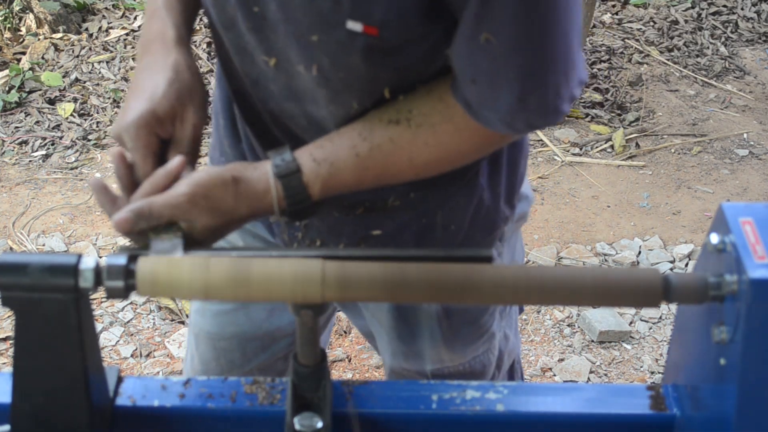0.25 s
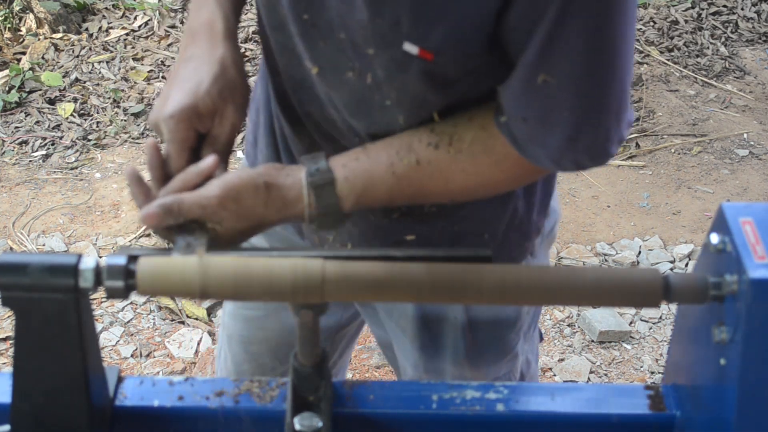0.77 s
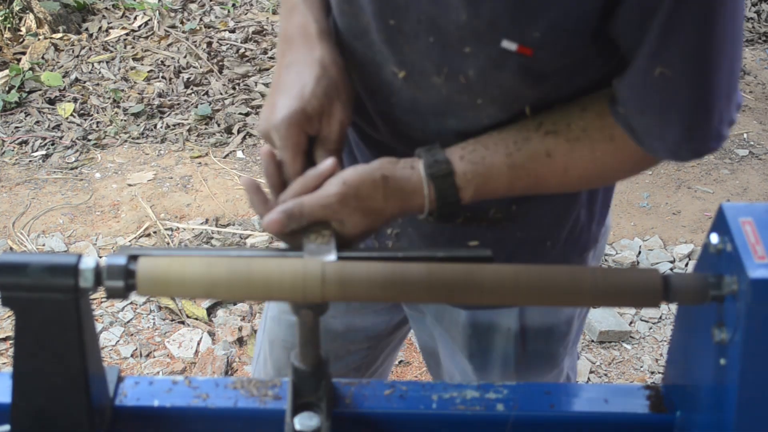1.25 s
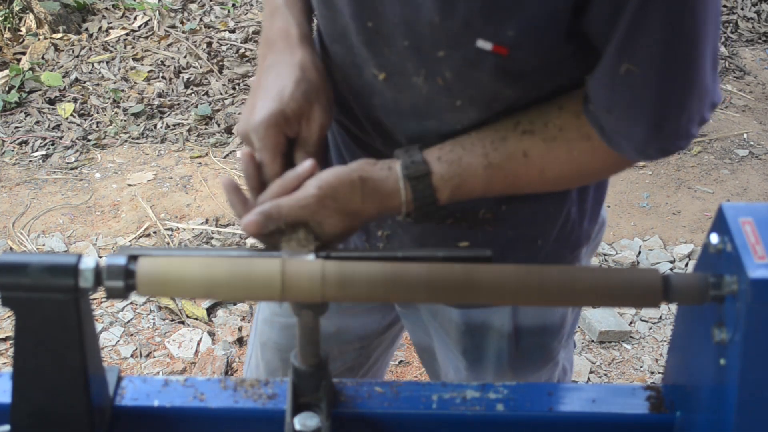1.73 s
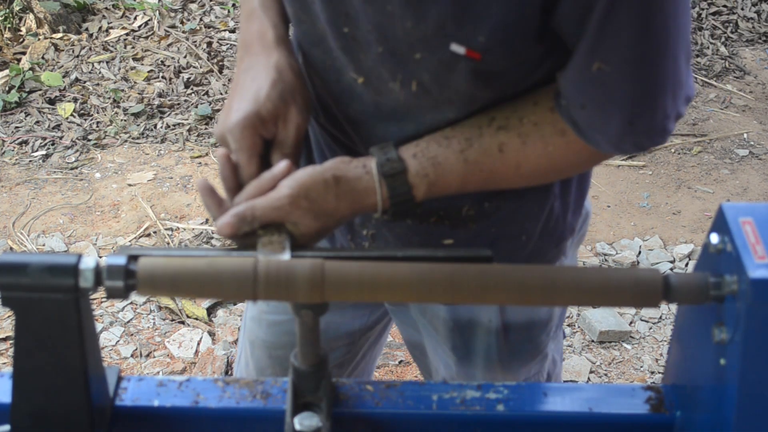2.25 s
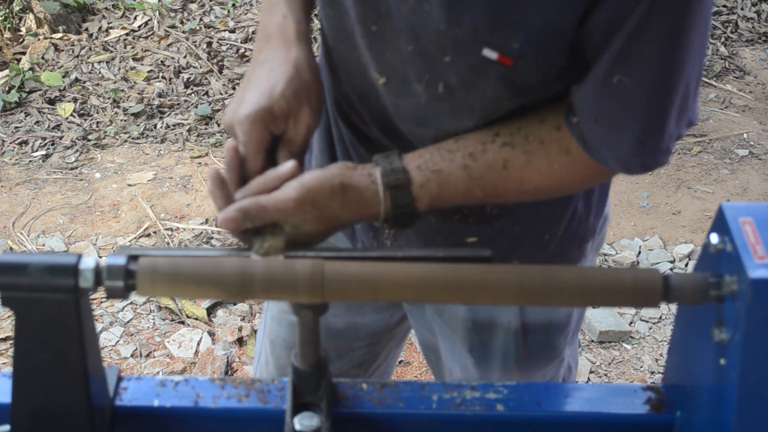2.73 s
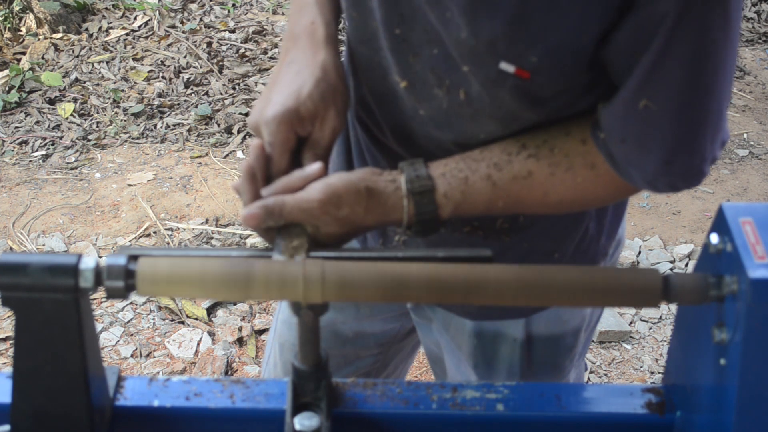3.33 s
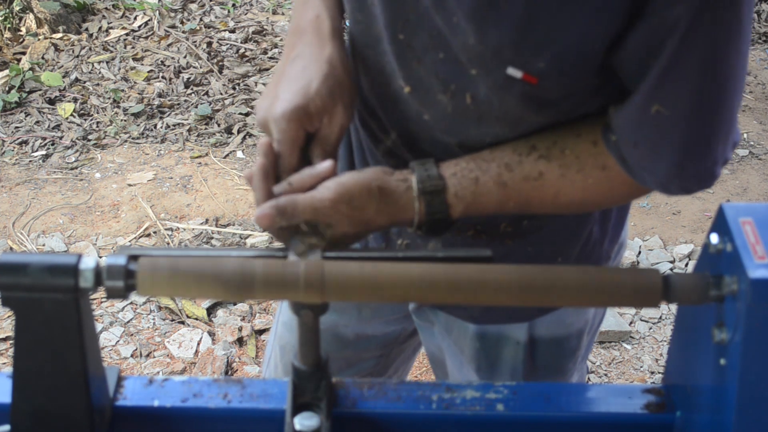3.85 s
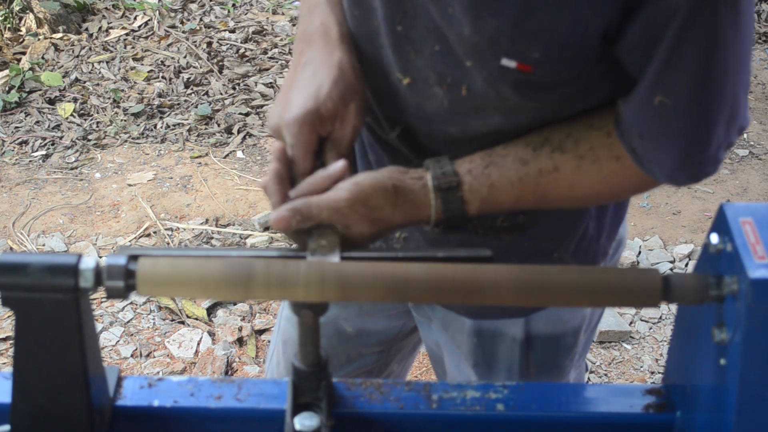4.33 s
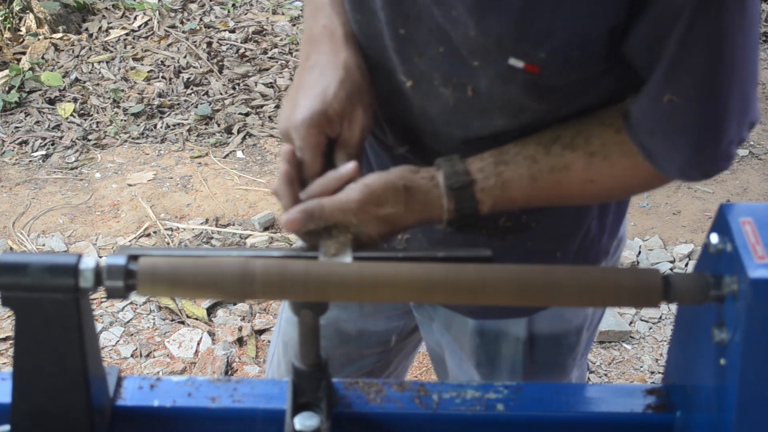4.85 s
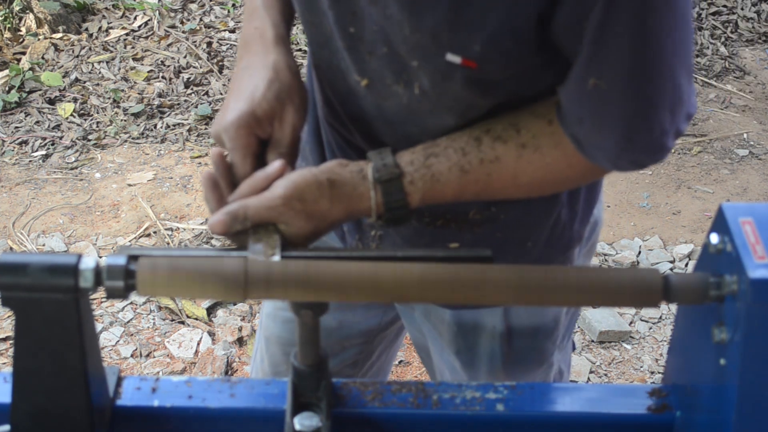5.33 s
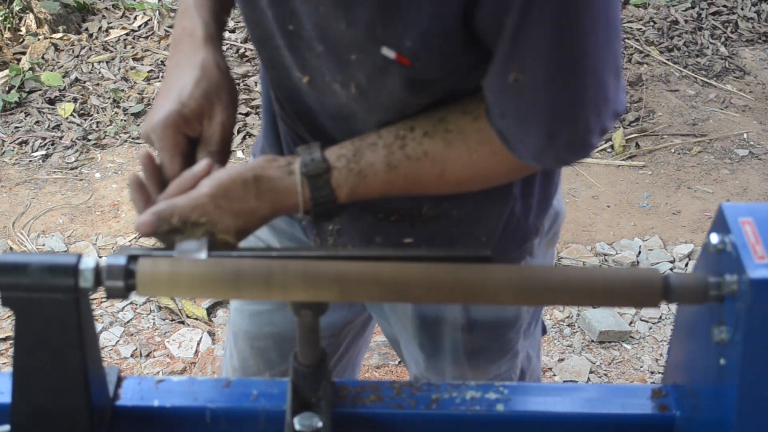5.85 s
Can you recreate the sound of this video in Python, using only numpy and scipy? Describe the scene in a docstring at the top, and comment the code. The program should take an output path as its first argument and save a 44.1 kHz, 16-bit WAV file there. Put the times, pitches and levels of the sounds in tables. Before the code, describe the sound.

A hand-held chisel scrapes a fast-spinning wooden blank on a humming electric lathe, with rough raspy surges, brief squeals and a light breeze outdoors.

```python
"""A hand-held chisel scrapes along a wooden blank that spins on an electric lathe in the open air.
Rough friction rings blank, chisel and tool rest; the place of the edge and its force set the balance of resonances.
The edge travels from the tailstock end to mid-span and back; the hardest mid-span pushes dig in.
Short squeals and a low shudder are sine tones, bearings and belt repeat a roughness every turn, and the
motor hums at multiples of a speed that sags under load. A breeze of filtered noise brushes the microphone."""
import sys
import numpy as np
from scipy import signal
from scipy.fft import rfft, irfft
from scipy.io import wavfile
from scipy.ndimage import uniform_filter1d, map_coordinates

SR = 44100
rng = np.random.default_rng(int(sys.argv[2]) if len(sys.argv) > 2 else 0)


def pcm_store(signal):
    """Save signal as 16-bit PCM."""
    levels = np.round(np.clip(np.atleast_2d(signal), -1, 1) * 32767)
    wavfile.write(sys.argv[1], SR, levels.astype(np.int16).T)


N = 268121
T = np.arange(N) / SR


def gain_of(db):
    """Decibels to amplitude."""
    return 10 ** (np.asarray(db) / 20)


def evened(x):
    """Scales to an rms of 1."""
    return x / np.sqrt(np.mean(x ** 2) + 1e-20)


def curves(rows):
    """Every column of a table of times, joined by straight lines."""
    seconds, *columns = np.transpose(rows)
    return [np.interp(T, seconds, column) for column in columns]


def read(f, values, hz):
    """A spectrum joined by straight lines on a log-frequency axis."""
    return np.interp(np.log(hz + 1), np.log(np.asarray(f) + 1), values)


def drift(rate_hz):
    """Random wander of rms 1: noise under a Gaussian low-pass."""
    hz = np.fft.rfftfreq(N, 1 / SR)
    lowpass = np.exp(-(hz / rate_hz) ** 2) * (hz > 0)
    return evened(irfft(rfft(rng.standard_normal(N)) * lowpass, N))


def swell(s, half, order=2):
    """A rounded rise and fall around the time s; a higher order flattens its top."""
    return np.exp(-abs((T - s) / half) ** order)


def ring(x, f, colour_db, modes=(), size=16384):
    """Causal minimum-phase filter: a broad colour with resonances (Hz, width, dB) standing on it."""
    hz = np.fft.rfftfreq(size, 1 / SR)
    peaks = sum(gain_of(db) ** 2 / (1 + (2 * (hz - centre) / width) ** 2) for centre, width, db in modes)
    log_gain = np.log(gain_of(read(f, colour_db, hz)) * np.sqrt(1 + peaks))
    mirrored = np.r_[log_gain, log_gain[-2:0:-1]]
    spectrum = np.exp(signal.hilbert(mirrored).conj())
    response = np.fft.ifft(spectrum).real[:size // 2]
    # the end of x runs in first, so the filter is already ringing at the start
    return signal.fftconvolve(np.r_[x[-size:], x], response)[size:size + N]


def surface(turns, memory_turns, size=736):
    """Roughness around a turning part: it comes back every turn while fresh bumps gradually replace it."""
    kept = np.exp(-1 / memory_turns)
    fresh = rng.standard_normal((int(turns[-1]) + 2, size))  # one row a turn
    before = kept * rng.standard_normal((1, size))
    rough = signal.lfilter([np.sqrt(1 - kept ** 2)], [1, -kept], fresh, axis=0, zi=before)[0]
    return evened(map_coordinates(rough.ravel(), [turns * size], order=3, mode="nearest"))


# Breeze on the microphone. Each row: time in seconds, level in dB.
BREEZE = [(0, -75), (.8, -69.5), (2.3, -73.5), (3.0, -62), (3.7, -69.5), (4.2, -62), (4.5, -75),
          (5.3, -65.5), (5.8, -83), (6.08, -69)]
# Colour of its rumble. Each row: frequency in Hz, relative density in dB per Hz.
BREEZE_COLOUR = [(15, -24), (50, -6.5), (100, -1), (170, -2), (260, -7.5), (400, -28), (900, -59),
                 (3000, -94)]
# Puffs of air that bump the microphone. Each row: time of the peak in seconds, level in dB.
PUFFS = [(.996, -51), (1.284, -63), (2.358, -59), (3.226, -58), (4.847, -50)]
PUFF_S = .026  # half length of a puff


def breeze(lumpy_db=5.0, lumps_hz=14):
    """Turbulent air rumbles on the microphone: low noise with a lumpy level and a few sharper puffs."""
    rumble = evened(ring(rng.standard_normal(N), *np.transpose(BREEZE_COLOUR)))
    puffs = sum(gain_of(db) * swell(s, PUFF_S) for s, db in PUFFS)
    steady = gain_of(curves(BREEZE)[0] + lumpy_db * drift(lumps_hz))
    return rumble * (puffs + steady)


# Shudders of the blank. Each row: time of the peak in seconds, half length in seconds, level in dB.
SHUDDERS = [(0.029, .085, -54.5), (0.515, .07, -59.5), (0.868, .12, -54), (5.863, 0.083, -63)]


def shuddering():
    """Amplitude of the blank's shudder."""
    return sum(gain_of(db) * swell(s, half) for s, half, db in SHUDDERS)


IDLE_HZ, SAG_HZ = 61.48, .75  # turns a second when free, and lost at the usual force
INERTIA_S = 0.064  # the spindle's mass evens out the braking over this window
SHUDDER_DRAG_HZ, SHUDDER_FULL_DB = 1.9, -55  # turns a second lost in a shudder of this level


def spindle(force_db):
    """Angle in turns: cut and shudder brake the motor, and the spindle's mass smooths the sag."""
    sag = SAG_HZ * gain_of(force_db) + SHUDDER_DRAG_HZ * shuddering() / gain_of(SHUDDER_FULL_DB)
    speed_hz = IDLE_HZ - uniform_filter1d(sag, max(int(INERTIA_S * SR), 1))
    return np.cumsum(speed_hz) / SR


# Resonances of blank, chisel and tool rest. Each row: frequency in Hz, width in Hz, then height in dB over
# the scrape with the edge at the tailstock end, at mid-span, and dug in.
MODES_OF_RIG = [(418, 21, 10, 19, 26), (550, 70, 2.5, 22.5, 17), (694, 9.5, 2, 20, 28.5),
                (776, 15.6, 16.5, 24.5, 27), (826, 9.1, 4.5, 21, 8), (936.5, 25.6, 22.5, 23, 21.5),
                (1104, 18, 11, 18.5, 1), (1132, 48, 22, 15, 13), (1319, 46, 21, 21.5, 21),
                (1476, 86, 17.5, 15, 17), (1709, 56, 26, 14, 9), (1816, 65, 21.5, 13, 10),
                (2108, 15, 15, 10, 22), (2210, 88, 17, 6, 12.5), (2410, 26, 19, 7.5, 3),
                (2581, 64, 18, 10.5, 12), (2781, 7.3, 20, 13.5, 18.5), (2950, 66, 4, 5, 12),
                (3160, 57, 2, 6.5, 10), (3630, 38, 8, 1, 9), (3753, 65, 9, 12, -6), (3950, 67, -11, -17, 1),
                (4355, 66, 5.5, 1.5, 10), (4630, 150, 1, -1, 5), (5250, 63, -3, 1, 0),
                (5680, 68, 10.5, 1, 8), (6640, 120, -2, 1, 3.5), (9620, 190, 8.5, -8, -5),
                (12800, 144, -3, 6, 10)]
# Bearings and belt before the rig colours them. Each row: frequency in Hz, relative density in dB per Hz.
RUNNING = [(150, -49), (450, -29.5), (620, -10), (850, -7), (1150, -3), (1700, 3), (2600, 6.5), (3800, -8),
           (5500, -9), (9000, -14), (15500, -19)]
# Hum of the drive. Each row: multiple of the spindle speed, level in dB when cutting at the end, and at mid-span.
HUM = [(3, -75, -96), (4, -64, -74.5), (5, -78, -70), (6, -69, -68), (7, -67.5, -75), (9, -62.5, -66.5),
       (10, -61, -65), (12, -59, -63.5), (14, -62, -56), (15, -64, -58.5)]


def lathe(turns, place, running_db=-43.0, memory_turns=8, waver_db=2.0):
    """Bearings and belt rattle much alike from turn to turn and ring the rig, over the hum of spindle orders."""
    modes = [(hz, width, middle_db) for hz, width, _, middle_db, _ in MODES_OF_RIG]
    rattle = ring(surface(turns, memory_turns), *np.transpose(RUNNING), modes)
    running = gain_of(running_db) * evened(rattle)
    hum = 0
    for order, end_db, middle_db in HUM:
        level = gain_of(end_db + place * (middle_db - end_db) + waver_db * drift(6.4))
        hum = hum + level * np.sqrt(2) * np.sin(2 * np.pi * (round(order) * turns + rng.random()))
    return running + hum


def shudder(turns, order=4):
    """The edge rides the not quite round blank: a low drone at four cycles a turn."""
    return shuddering() * np.sqrt(2) * np.sin(2 * np.pi * order * turns)


# Chatter squeals. Each row: time of the peak in seconds, half length in seconds, rough pitch in Hz, level in dB.
CHATTER = [(.016, .043, 1700, -41), (0.228, 0.019, 2575, -30.5), (0.686, 0.047, 1700, -22.5),
           (0.886, .045, 2575, -33.5), (1.535, 0.1, 780, -28), (1.9, 0.066, 780, -35.5),
           (2.741, 0.055, 930, -27.5), (2.958, 0.053, 2780, -26.5), (3.106, 0.027, 780, -30.5),
           (3.983, 0.053, 2780, -24.5), (4.33, 0.047, 780, -33.5), (6.076, .037, 1700, -25)]


def chatter(turns, waver=0.00256, flutter_db=2.5, throb_db=-1.0):
    """Where the edge grabs, a short wavering squeal sounds at the nearest rig mode and throbs with each turn."""
    centres = np.transpose(MODES_OF_RIG)[0]
    clock = np.cumsum(1 + waver * drift(66)) / SR
    squeals = 0
    for s, half, hz, db in CHATTER:
        mode_hz = centres[np.argmin(abs(centres - hz))]
        tone = np.sqrt(2) * np.sin(2 * np.pi * (mode_hz * clock + rng.random()))
        squeals = squeals + gain_of(db) * swell(s, half) * tone
    return squeals * gain_of(flutter_db * drift(110) + throb_db * np.cos(2 * np.pi * turns))


def friction(turns, memory_turns=1.42, repeat_hz=1500, throb_db=1.17, snaps_per_s=1500, snap_db=2.5,
             snap_share=0.23, shake_db=0.89, shake_hz=80):
    """Force at the edge: coarse bumps repeat from turn to turn, fine fibres snap at random."""
    hz = np.fft.rfftfreq(N, 1 / SR)
    snap_times = rng.random(N) < snaps_per_s / SR
    snap_sizes = rng.choice([-1, 1], N) * gain_of(snap_db * np.minimum(rng.exponential(1, N), 4))
    share = np.clip(snap_share, 0, 1)
    fibres = np.sqrt(share) * evened(snap_times * snap_sizes) + np.sqrt(1 - share) * rng.standard_normal(N)
    repeats = 1 / (1 + (hz / repeat_hz) ** 2)  # share of power that comes back each turn
    coarse = rfft(surface(turns, memory_turns)) * np.sqrt(repeats)
    fine = rfft(fibres) * np.sqrt(1 - repeats)
    # the high side passes once a turn; the tool shakes in the hand
    angle = 2 * np.pi * turns + .5 * drift(11)
    return irfft(coarse + fine, N) * gain_of(throb_db * np.cos(angle) + shake_db * drift(shake_hz))


def grip(x, patchy_db=1.49):
    """Small shifts of grip and contact favour now one stretch of the spectrum, now another."""
    z = signal.stft(x, nperseg=512, noverlap=384)[2]
    patches = rng.standard_normal(z.shape[::-1])
    patches = uniform_filter1d(patches, size=32, axis=0)  # smooth in time
    patches = evened(uniform_filter1d(patches, size=9, axis=1))  # smooth in frequency
    return signal.istft(z * gain_of(patchy_db * patches.T), nperseg=512, noverlap=384)[1][:N]


def steel(x, t60=0.041, wet_db=-5):
    """The many close, high modes of steel tool and rest: a short dense treble ring with a 10 ms build-up."""
    t = np.arange(4096) / SR
    tail = rng.standard_normal(len(t)) * gain_of(-60 * t / t60) * np.minimum(t / .01, 1) ** 3
    highpass = signal.butter(6, 4200, "high", fs=SR, output="sos")
    tail = signal.sosfilt(highpass, tail / np.linalg.norm(tail))
    return x + gain_of(wet_db) * signal.fftconvolve(x, tail)[:N]


def bands(x):
    """Splits into the blank's bending range, the rasp and the hiss."""
    hz, z = np.fft.rfftfreq(N, 1 / SR), rfft(x)
    low = 1 / (1 + (hz / 1050) ** 16)
    high = 1 - 1 / (1 + (hz / 7500) ** 7)
    return np.array([irfft(z * part, N) for part in (low, 1 - low - high, high)])


# Colour of tearing fibres. Each row: frequency in Hz, then relative density in dB per Hz with the edge
# at the tailstock end, at mid-span, and dug in.
SCRAPE = [(100, -41, -46.5, -60), (336, -30, -31.5, -27.5), (480, -21.5, -43.5, -29),
          (591, -19, -32.5, -21), (849, -17, -11, -4.5), (1184, -17.5, -22, -15.5),
          (2020, -16.5, -13.5, -7.5), (2950, -7, -9.5, -4), (4950, -11.5, -11, -4.5),
          (6900, -9.5, -10.5, -4.5), (7500, -14.5, -15, -7.5), (10740, -15.5, -13.5, -7.5),
          (12960, -16.5, -21, -20), (15500, -28, -27.5, -18)]
# The blank's low ring at the usual force, strongest between the supports. Each row: time in seconds, level in dB.
BENDING = [(0, -42.5), (.7, -41), (1.1, -36.5), (2.05, -38.5), (2.85, -36), (3.5, -37), (4.15, -33.5),
           (4.7, -36), (5.6, -36.5), (6.0, -42)]
# Hiss of fine chips at the usual force. Each row: time in seconds, level in dB.
HISS = [(0, -42.5), (.3, -45), (.44, -37.5), (.68, -43.5), (1.05, -35.5), (1.55, -40.5), (2.15, -38),
        (3.1, -41), (4.15, -40.5), (5.05, -39), (5.82, -33.5), (6.08, -41)]
USUAL_DB = -32  # the usual force of the edge on the wood, as the level of its rasp
DIG_FROM_DB, DIG_RANGE_DB = 4.5, 4.5  # force where digging in starts at mid-span, and how much more is fully in
SKIM_DB, SKIM_TURNS = 8, 6.7  # this far under the usual force the edge only skims; memory of its bumps
BEND_GROWTH, HISS_GROWTH = 0.47, 0.77  # dB gained for each dB of press
BEND_LOSS, HISS_LOSS = 0.54, 1.23  # dB lost for each dB of lift


def chisel(turns, place, press_db, lift_db, unsteady_db=0.68, unsteady_hz=28, sway_db=0.78, sway_hz=14):
    """Friction rings the rig; place and depth of the edge blend three ways of ringing, force sets the levels."""
    force_db = press_db - lift_db
    dug = place * np.clip((force_db - DIG_FROM_DB) / DIG_RANGE_DB, 0, 1)
    skim = np.clip(-force_db / SKIM_DB, 0, 1)
    shares = [(1 - place) * (1 - dug), place * (1 - dug), dug]  # end, mid-span, dug in
    f, *colours = np.transpose(SCRAPE)
    centres, widths, *heights = np.transpose(MODES_OF_RIG)

    cutting = np.sqrt(1 - skim) * friction(turns)
    skimming = np.sqrt(skim) * friction(turns, SKIM_TURNS)
    drive = grip(cutting + skimming)
    parts = 0
    for share, colour, height in zip(shares, colours, heights):
        ringing = bands(ring(steel(drive), f, colour, zip(centres, widths, height)))
        parts = parts + share * ringing / ringing.std(axis=1, keepdims=True)

    bend_db = curves(BENDING)[0] + BEND_GROWTH * press_db - BEND_LOSS * lift_db + sway_db * drift(sway_hz)
    hiss_db = curves(HISS)[0] + HISS_GROWTH * press_db - HISS_LOSS * lift_db
    levels = gain_of([bend_db, USUAL_DB + force_db, hiss_db])
    return (parts * levels).sum(axis=0) * gain_of(unsteady_db * drift(unsteady_hz))


def gestures(rows, flat):
    """Sums rounded movements of the hand, each with its own rise and fall, in dB."""
    return sum(db * np.where(T < s, swell(s, rise, flat), swell(s, fall, flat)) for s, rise, fall, db in rows)


# Travel of the edge. Each row: time in seconds, place from 0 at the tailstock end to 1 at mid-span.
PLACE = [(0, 0.015), (.7, 0.035), (1.0, .33), (1.25, 0.99), (5.35, 1), (5.65, .61), (5.9, 0), (6.08, 0.24)]
# How hard the hand leans on the chisel. Each row: time in seconds, dB over the usual force.
LEAN = [(0, 4), (.38, 2), (.6, 5.5), (.88, 6), (1.08, 3), (1.28, -4), (2.05, -2), (2.55, 0), (2.85, 2.5),
        (3.15, 0), (3.6, -3.5), (4.2, -2), (4.8, -3), (5.08, 1.5), (5.5, .5), (5.82, 4.5), (6.08, 1)]
# Pushes into the wood. Each row: time of the peak in seconds, build-up in seconds, easing in seconds, dB added.
PUSHES = [(.225, .02, 0.023, 3.5), (.47, 0.016, 0.035, 3), (1.165, 0.046, 0.034, 5.5),
          (1.56, 0.15, .11, 10.5), (1.93, 0.1145, 0.064, 8.5), (2.26, 0.11, 0.061, 3),
          (2.425, .025, 0.018, 3.5), (2.74, 0.062, 0.039, 5.5), (2.945, 0.076, 0.0707, 9.5),
          (3.32, 0.013, 0.048, 3), (3.96, 0.0724, 0.0667, 12.5), (4.4, 0.15, 0.031, 4),
          (4.66, 0.056, 0.038, 5.5), (4.925, 0.066, 0.016, 3), (5.115, 0.021, 0.033, 2.5)]
# The edge eases off and bites again. Each row: lightest moment, easing and return in seconds, dB lost.
LIFTS = [(.29, 0.032, 0.042, 3), (1.965, 0.0041, 0.0065, 5), (2.495, 0.039, .03, 4.5),
         (3.06, 0.028, 0.014, 5), (3.78, 0.113, 0.022, 15), (4.44, .012, 0.03, 5),
         (4.955, 0.013, 0.066, 4.5)]
PUSH_FLAT, LIFT_FLAT = 2.9, 2.9  # flatness of the top (2 = a bell curve)


def scene():
    """The hand's force brakes the spindle, whose angle drives both the cut and the machine."""
    place = np.clip(curves(PLACE)[0], 0, 1)
    press_db = curves(LEAN)[0] + gestures(PUSHES, PUSH_FLAT)
    lift_db = gestures(LIFTS, LIFT_FLAT)
    turns = spindle(press_db - lift_db)
    machine = lathe(turns, place) + shudder(turns)
    cut = chatter(turns) + chisel(turns, place, press_db, lift_db)
    return (breeze() + machine + cut)[None]


EDGE_HZ = 15700  # top of the recorder's band


def record(dry):
    """The recorder's band limit: a steep linear-phase low-pass."""
    lowpass = signal.firwin(1023, EDGE_HZ, window=("kaiser", 9), fs=SR)
    return signal.oaconvolve(dry, lowpass[None], "same")


dry = scene()
out = record(dry)
pcm_store(out)
```